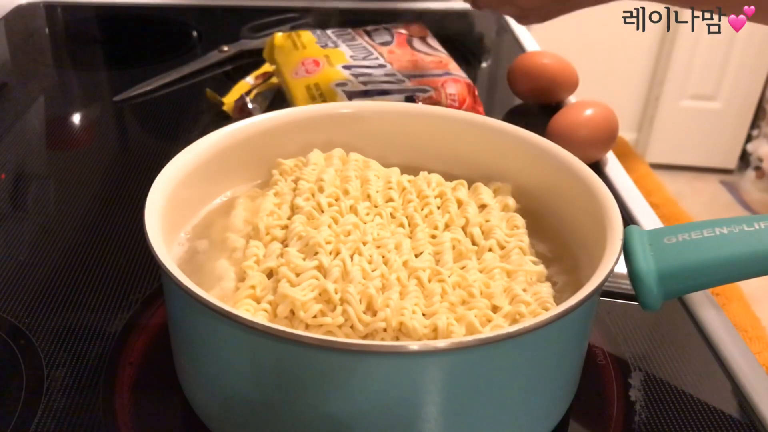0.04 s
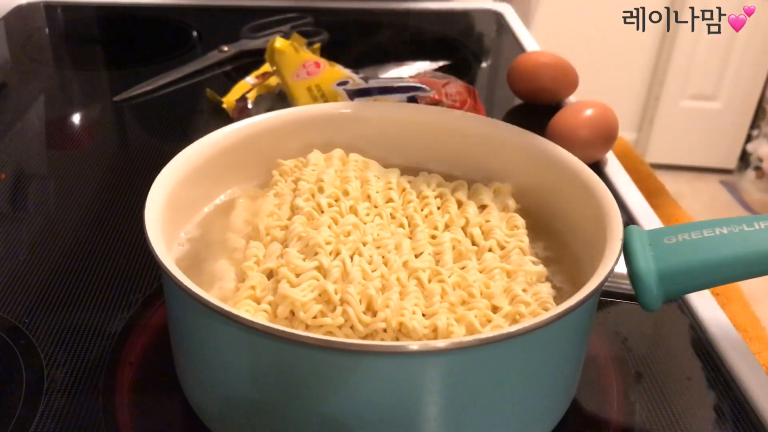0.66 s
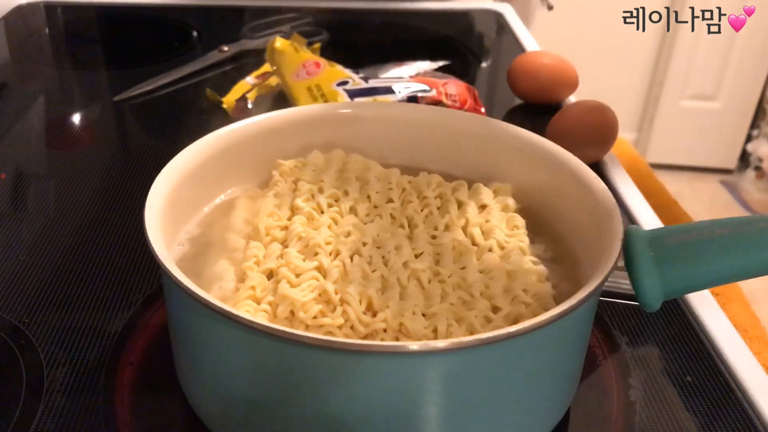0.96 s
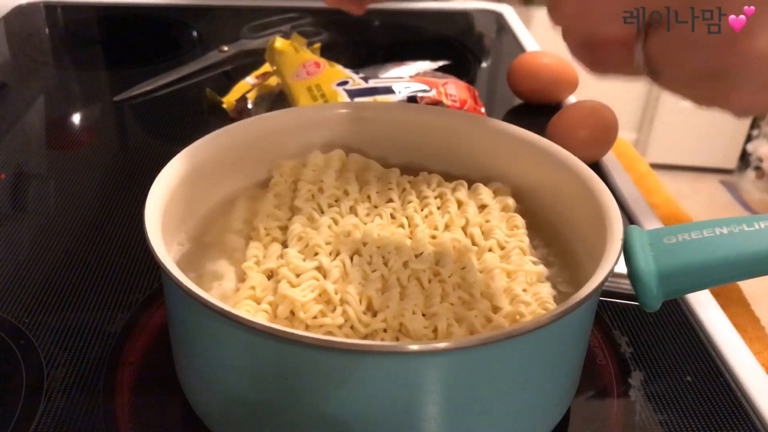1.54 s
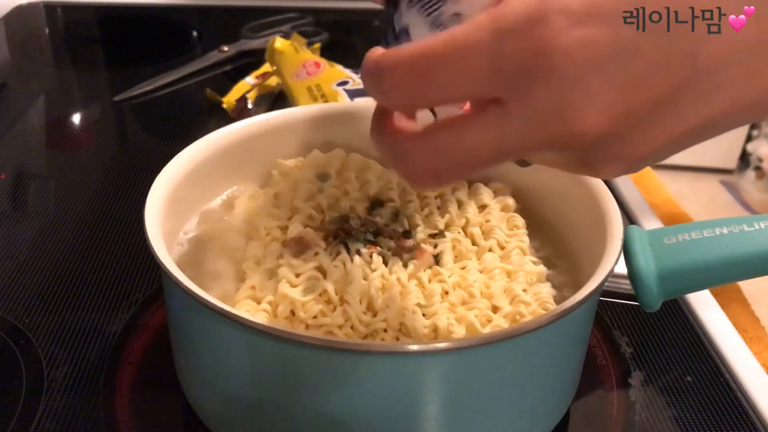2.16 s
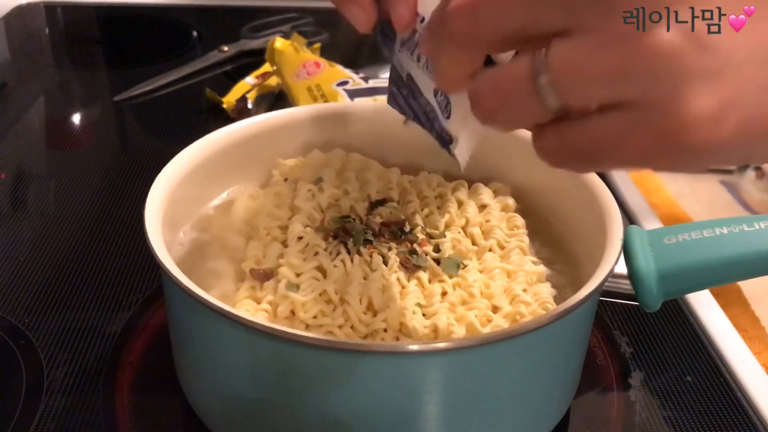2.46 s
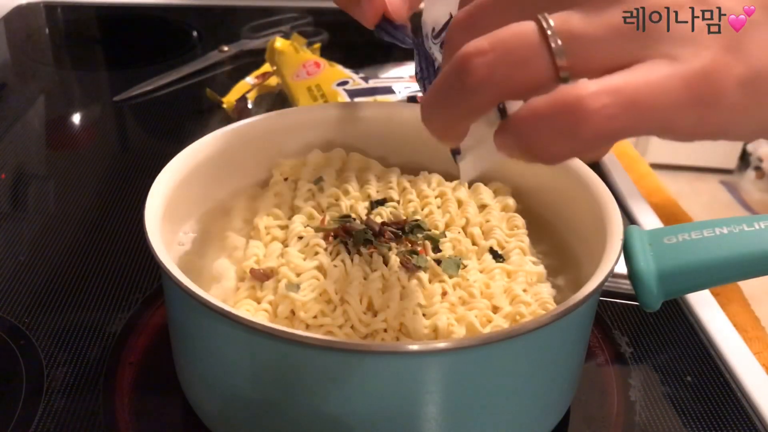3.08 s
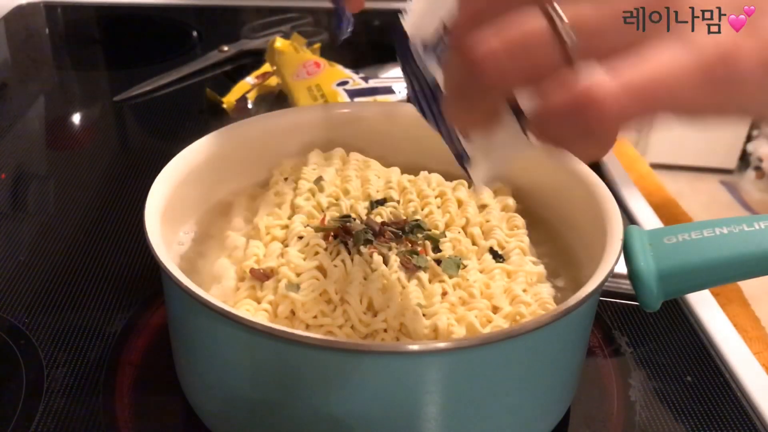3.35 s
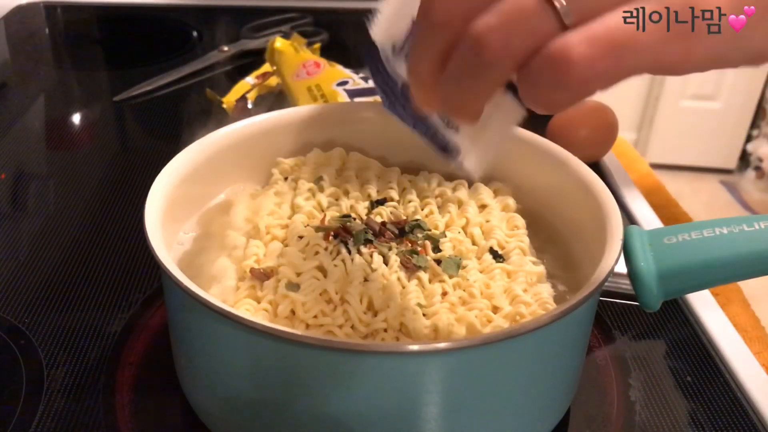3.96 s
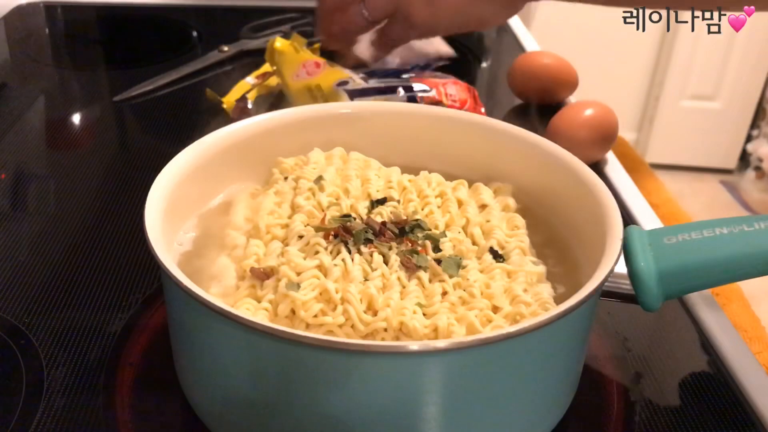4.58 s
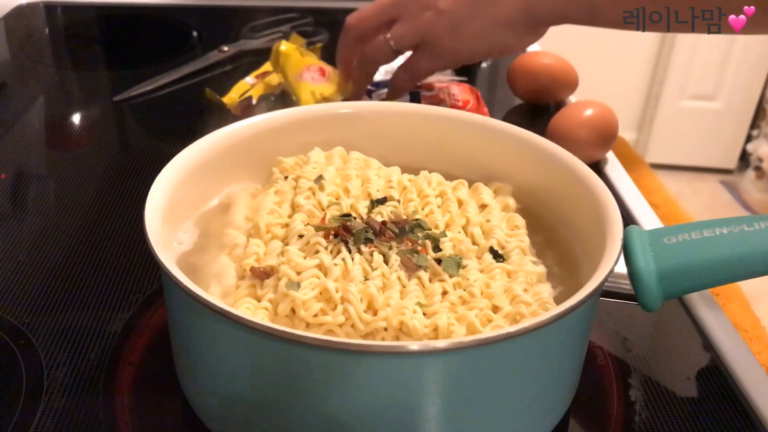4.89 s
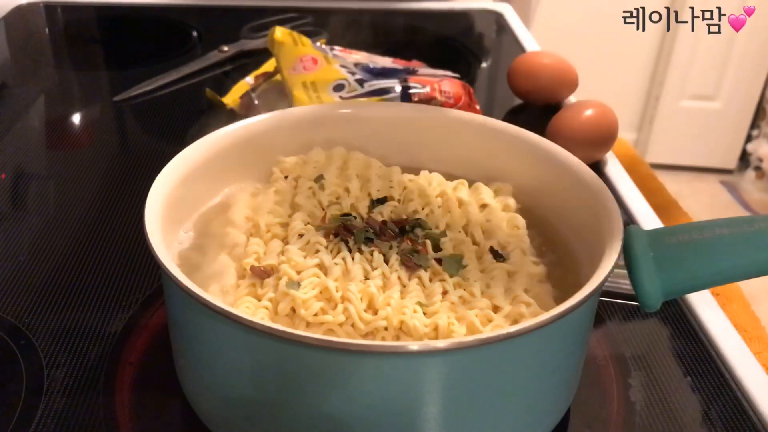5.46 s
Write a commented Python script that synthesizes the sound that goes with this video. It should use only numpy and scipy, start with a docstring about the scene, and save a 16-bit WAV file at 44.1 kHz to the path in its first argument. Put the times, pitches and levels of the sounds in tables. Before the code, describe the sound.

A low appliance hum and the faint hiss and bubbling of simmering water run throughout, heard close to a pot in a small kitchen. In the first second a foil-plastic sachet is picked up, rustling, with dull knocks on the stove top at about 0.1 and 0.5 seconds, the second the loudest, and a softer one at 0.8. From about 1.1 seconds the sachet is torn open, with a dense, crisp rip around 1.3 to 1.6. From 1.9 to 4 seconds it is shaken out: irregular sharp snaps over fine crackle, busiest between 3.5 and 4. A short lull follows with only a few faint ticks. At about 4.7 to 5.1 the packet is put down with soft bumps, a quick cluster of light knocks and more crinkling. A few small crackles come around 5.3 to 5.5. Each click has a very short room echo.

```python
"""A small kitchen, the microphone close to a pot of noodles. An appliance hums and the water simmers
faintly throughout. First a foil-plastic seasoning sachet is picked up, with a few dull knocks from the
stove top. It is torn open, then shaken out over the pot: the film buckles in sharp snaps over a bed of
fine crackle. Near the end it is put back down, with more knocks. The room answers every click."""
import sys
import numpy as np
from scipy import signal
from scipy.fft import rfft, irfft
from scipy.io import wavfile
from scipy.ndimage import uniform_filter1d

SR = 44100
rng = np.random.default_rng(int(sys.argv[2]) if len(sys.argv) > 2 else 0)


def inscribe(sig):
    """Save sig as 16-bit PCM at rate SR to the path in sys.argv[1].

    A 1-D sig is mono; a 2-D sig holds one channel per row.
    Samples are clipped to [-1, 1] before scaling.
    """
    pcm = np.round(np.clip(np.atleast_2d(sig).T, -1, 1) * 32767)
    wavfile.write(sys.argv[1], SR, pcm.astype(np.int16))


N = 248283

# Mains hum and motor tones. Each row: frequency in Hz, rms level in dB.
HUM_TONES = [(59.3, -60.5), (96.9, -98), (120, -58), (145.3, -59.5), (177.7, -67), (193.8, -61.5),
             (237, -54.5), (242.2, -62), (290.6, -70.5), (339.1, -68), (355.5, -73), (387.5, -69),
             (415, -72)]
# Moving air and the hiss of hot water. Each row: frequency in Hz, relative level in dB.
AIR_SPECTRUM = [(15, -17), (28, -21), (42, 3), (70, 5.5), (140, 8), (220, 4.5), (280, 5.5), (350, 0.5),
                (430, -7), (520, -4), (800, -9), (1400, -16), (2500, -34), (4500, -18.5), (6500, -16.5),
                (8200, -20.5), (12500, -15), (16000, -27)]
# Finger moves: picking up, tearing from 1.05 s, shaking from 1.86 s, putting down from 4.74 s.
# Each row: start in seconds, length in seconds, crackle level in dB, rustle level in dB.
FINGER_MOVES = [(0.0, 0.083, -53.5, -73), (0.297, 0.09, -52, -48.5), (0.407, 0.13, -47.5, -43.5),
                (0.68, 0.24, -61, -61.5), (1.052, 0.12, -53, -59), (1.283, .35, -49, -62),
                (1.325, .15, -41, -47.5), (1.859, 0.16, -47, -53), (2.003, 0.26, -48.5, -59),
                (2.267, 0.175, -58.5, -65.5), (2.48, 0.011, -43, -45.5), (2.56, 0.34, -56.5, -59.5),
                (2.925, .1, -69, -59.5), (3.113, 0.015, -48.5, -52.5), (3.271, 0.025, -52.5, -49.5),
                (3.494, 0.053, -64, -49.5), (3.68, 0.035, -39, -48), (3.845, 0.023, -48, -48),
                (3.95, 0.033, -41, -54.5), (4.741, 0.094, -53.5, -52.5), (4.885, 0.21, -51.5, -54),
                (5.323, 0.051, -50, -60.5)]
# The fine crackle of small creases. Each row: frequency in Hz, relative level in dB.
CRACKLE_SPECTRUM = [(500, -11), (1500, -27), (3000, -1.5), (5000, -2.5), (6800, -1.5), (8200, -4.5),
                    (9500, -5), (12500, -7), (16000, -5)]
# The duller rustle of the whole packet. Each row: frequency in Hz, relative level in dB.
RUSTLE_SPECTRUM = [(200, -13), (400, 0.5), (600, -1.5), (1150, 2), (1800, -0.5), (2600, -1), (5000, -24.5),
                   (12000, -49)]
# Things set down on the stove top. Each row: start in seconds, level in dB,
# the thing's own ring in Hz, that ring's level in dB relative to the stove's.
STOVE_KNOCKS = [(0.1341, -25.5, 1760, 1.5), (0.5257, -14.5, 2330, -3), (0.7827, -41, 1820, 9.5),
                (4.7652, -38, 2640, -14), (4.7912, -30.5, 2670, -8), (4.804, -33, 2180, -5),
                (4.8763, -25.5, 2740, -5.5)]
# The stove top's modes. Each row: frequency in Hz, relative level in dB, seconds to fall 60 dB.
STOVE_MODES = [(700, 4.5, 0.018), (1006, 10, 0.017), (1050, 11, 0.014), (1217, 18.5, 0.018)]
# Distinct clicks: film snaps, plus a few faint pops or ticks from the pot. Each row: time in seconds,
# level at 3-8 kHz in dB before FILM_COLOUR, body (below) and sparkle (above) in dB relative to that.
CLICKS = [(0.3005, -31.5, 0, -4), (0.3397, -34.5, -2, -2.5), (0.3726, -33.5, -2, -4.5),
          (0.4422, -32, -7, 7), (0.4613, -23, 0, -2), (0.6774, -29.5, -4.5, 3), (0.7183, -39.5, 2.5, -5.5),
          (0.8843, -42, 3.5, -15), (1.0309, -32, -2.5, -3), (1.064, -40, 8.5, 1), (1.181, -39.5, 3, 1.5),
          (1.2137, -30.5, 0.5, -1.5), (1.2911, -32.5, -6, -2.5), (1.3059, -29.5, 0, -1),
          (1.3563, -27.5, 0.5, 6), (1.3604, -26.5, -1.5, -0.5), (1.3763, -20, -1.5, -0.5),
          (1.4145, -21.5, 0, 1), (1.4335, -26, -11, 17.5), (1.4632, -36, 4, 17), (1.4745, -21.5, -7, 10.5),
          (1.5077, -37, 5.5, 4.5), (1.5653, -33, -4.5, 1), (1.6173, -34.5, -7, 7.5), (1.6465, -34.5, -8, 3),
          (1.8404, -33, -10, 7), (1.9666, -21.5, -19, 0), (1.9856, -26.5, -7, 6.5),
          (2.2017, -23.5, -3, -0.5), (2.221, -32, 3, 4.5), (2.2271, -27.5, -4, -3.5), (2.3041, -37.5, 5, 4),
          (2.4803, -30, -3, -0.5), (2.5198, -23.5, -3, 1), (2.5884, -33, -3.5, 9),
          (2.6207, -30.5, -2.5, -3), (2.6904, -39, 1, -0.5), (2.7194, -27, -2, -1), (2.73, -32, 2.5, 2.5),
          (2.8145, -35.5, -7.5, 2), (2.9209, -33.5, 1, 5), (2.9531, -34.5, 4.5, 4.5), (2.9613, -37.5, 2, 0),
          (2.9877, -35.5, -18, 7), (3.0058, -27, -8.5, -2), (3.0563, -32.5, -8, -1),
          (3.116, -34, 0.5, -3.5), (3.251, -34, -4.5, 11), (3.2876, -31, -6.5, 6.5),
          (3.302, -38.5, 2.5, 2.5), (3.481, -31, -2, 5), (3.5118, -27, -3, 5.5), (3.5357, -22, -4.5, 1.5),
          (3.54, -24, -14, 6), (3.5858, -25, -8.5, -5.5), (3.7015, -29, -3.5, -3.5),
          (3.729, -25.5, -7, 7.5), (3.7607, -26.5, -8, -1.5), (3.8435, -22.5, -9, 0),
          (3.8605, -24, -3, 9.5), (3.8765, -34, -17, 8), (3.8933, -26.5, -5, -5), (3.946, -33.5, 8, -2),
          (3.9698, -36, -6, 10), (3.992, -39.5, 5, -7.5), (4.092, -37, -4.5, -7.5), (4.1435, -45, 7, -4.5),
          (4.2737, -54.5, 13, -5), (4.4902, -47.5, 9, -10.5), (4.7502, -34, 1.5, 1),
          (4.877, -25.5, -2.5, 6), (4.9593, -39.5, -2, 8), (5.0007, -34.5, -0.5, -3), (5.497, -48, -14, 13),
          (5.543, -33.5, -12, -2)]
# Film tension and distance: taut sounds thin, slack lower; snaps ring longer farther off, on the stove.
# Each row: time in seconds, lower edge of the body in Hz, decay of a snap as heard in seconds.
TENSION_AND_DISTANCE = [(0.5, 890, 0.0055), (1.1, 1500, 0.0018), (1.45, 1370, 0.00058), (2.1, 880, 0.0019),
                        (3.3, 790, 0.00092), (3.55, 550, 0.00028), (4.0, 700, 0.00091), (4.8, 1110, 0.0044),
                        (5.5, 1330, 0.0029)]
# The film's colour as heard over the pot. Each row: frequency in Hz, gain in dB.
FILM_COLOUR = [(500, -6), (1100, -2.5), (1600, -4), (2300, -4), (3000, -2), (4200, 1), (5000, -0.5),
               (6700, 3), (8200, -4.5), (9500, 2), (10400, -4.5), (12000, 2), (16000, -8)]
# Soft bumps of hand and packet. Each row: start in seconds, level in dB, pitch in Hz.
HAND_BUMPS = [(0.419, -46.5, 427), (0.439, -51, 131), (0.782, -39.5, 660), (1.358, -45, 417),
              (1.374, -41, 550), (1.408, -46, 477), (4.683, -46, 145), (4.701, -42.5, 221),
              (4.788, -44, 390), (4.802, -45, 366)]
# The kitchen's decay. Each row: frequency in Hz, seconds to fall 60 dB.
ROOM_DECAY = [(200, 0.25), (1200, 0.25), (4000, 0.13), (9000, 0.26), (16000, 0.27)]
# The colour of the wall reflections. Each row: frequency in Hz, relative level in dB.
ROOM_COLOUR = [(200, -5.5), (1200, 4.5), (4000, 5.5), (9000, -1), (16000, -0.5)]

BODY_TOP_HZ, SPARKLE_HZ, EDGE_HZ = 2890, 8300, 16050  # upper edges of the film's three registers
MS = SR // 1000  # samples in a millisecond


def amp(db):
    """Decibels to gain."""
    return 10 ** (np.asarray(db) / 20)


def unit(x):
    """Scales to rms 1."""
    return x / np.sqrt(np.mean(x ** 2) + 1e-20)


def unit_click(x):
    """Scales to the energy of one millisecond at rms 1."""
    return x * np.sqrt(MS / (np.sum(x ** 2) + 1e-20))


def read(points, hz):
    """Reads a spectrum table on a log-frequency axis."""
    table_hz, value = np.transpose(points)
    return np.interp(np.log(hz + 1), np.log(table_hz + 1), value)


def add(mix, start_s, sound):
    """Mixes a sound in at its start time."""
    part = mix[max(round(start_s * SR), 0):][:len(sound)]
    part += sound[:len(part)]


def band(x, lo_hz, hi_hz):
    """Causal band-pass."""
    sections = signal.butter(3, [lo_hz, min(hi_hz, SR / 2 - 1)], "band", fs=SR, output="sos")
    return signal.sosfilt(sections, x)


def colour(x, spectrum):
    """Filters a scene-long signal by a spectrum table."""
    return irfft(rfft(x) * amp(read(spectrum, np.fft.rfftfreq(N, 1 / SR))), N)


def seconds(size):
    """Time axis of so many samples."""
    return np.arange(size) / SR


def grains(per_s, spread_db, decay_s, count=40):
    """A random patter of tiny bursts in many shapes and sizes."""
    t, out = seconds(256), np.zeros(N)
    shapes = [unit_click(noise * np.exp(-t / decay_s)) for noise in rng.standard_normal((count, len(t)))]
    sizes = amp(spread_db * np.minimum(rng.exponential(1, N), 3))
    pick = rng.integers(0, count, N)
    for at in np.flatnonzero(rng.random(N) < per_s / SR):
        add(out, at / SR, sizes[at] * shapes[pick[at]])
    return out


def appliance_hum(waver=0.013):
    """Mains and motor tones in the background, each wavering slightly in level."""
    t, out = seconds(N), np.zeros(N)
    knots = np.linspace(0, N / SR, 30)
    for hz, db in HUM_TONES:
        level = amp(db) * (1 + waver * np.interp(t, knots, rng.standard_normal(len(knots))))
        out += level * np.sqrt(2) * np.sin(2 * np.pi * (hz * t + rng.random()))
    return out


def simmer(hiss_db=-56, bubbles_db=-64):
    """Small bubbles burst in the pot, under moving air and the hiss of hot water."""
    bubbles = unit(band(grains(per_s=160, spread_db=4.5, decay_s=0.0015), 620, 7400))
    hiss = unit(colour(rng.standard_normal(N), AIR_SPECTRUM))
    return amp(hiss_db) * hiss + amp(bubbles_db) * bubbles


def finger_effort(attack_s=0.013, release_s=0.015, held_crackle_db=-62.5, held_rustle_db=-66):
    """Crackle and rustle gains: each move sets in quickly, holds, and dies as the film relaxes."""
    t = seconds(N)
    power = amp([[held_crackle_db], [held_rustle_db]]) ** 2 * np.ones(N)  # even a held packet stirs
    for start, length, crackle_db, rustle_db in FINGER_MOVES:
        attack = np.clip((t - start) / attack_s + 0.5, 0, 1)
        release = np.exp(-np.clip(t - start - length, 0, 1) / release_s)
        power += (amp([[crackle_db], [rustle_db]]) * attack * release) ** 2
    return np.sqrt(power)


def crinkle(crackle_gain, rustle_gain):
    """Small creases give way as hard as the fingers work, and the whole packet rustles."""
    crackle = unit(colour(grains(per_s=600, spread_db=3, decay_s=0.0009), CRACKLE_SPECTRUM))
    rustle = unit(colour(grains(per_s=500, spread_db=5, decay_s=0.0037), RUSTLE_SPECTRUM))
    return crackle * crackle_gain + rustle * rustle_gain


def small_buckles(crackle_gain, per_s=24, over_crackle_db=10, spread_db=4.5, top_db=-35):
    """Lesser buckles at chance moments, as strong as the film is worked: rows as in CLICKS."""
    count = int(per_s * N / SR)
    at = ((np.arange(count) + rng.random(count)) * N / count).astype(int)
    size, body, sparkle = np.clip(rng.standard_normal((count, 3)), -2, 2).T
    db = np.minimum(20 * np.log10(crackle_gain[at]) + over_crackle_db + spread_db * size, top_db)
    body_db, sparkle_db = -5 + 5.5 * body, 5.5 * sparkle
    return list(zip(at / SR, db, body_db, sparkle_db))


def film_flip(t, decay_s, facet_hz, flutter_db=-22, flutter_s=0.011, creases_db=-20, crease_s=0.0066,
              creases_per_s=300, before_s=0.0063, after_s=0.0047, facet_db=4, neighbour_db=-4):
    """A sheet strains, flips at t = 0, and flutters while nearby creases give way."""
    noise, sizes = rng.standard_normal((2, len(t)))
    age = np.maximum(t, 0)
    kicks = abs(sizes) * (rng.random(len(t)) < creases_per_s / SR)
    creases = signal.lfilter([1], [1, -np.exp(-1 / (crease_s * SR))], kicks)
    creases *= np.exp(np.minimum(t, 0) / before_s - age / after_s)
    snap = (t >= 0) * np.exp(-age / decay_s)
    flutter = (t >= 0) * np.exp(-age / flutter_s)
    stir = np.sqrt(min(decay_s * SR / MS, 2))  # a longer snap carries more flutter and creasing
    burst = noise * (snap + stir * (amp(flutter_db) * flutter + amp(creases_db) * creases))
    # the flipping facet rings, and so does a neighbour of random size
    facet = signal.lfilter(*signal.iirpeak(min(facet_hz, EDGE_HZ), Q=6, fs=SR), burst)
    neighbour_hz = np.exp(rng.uniform(np.log(1000), np.log(12000)))
    neighbour = signal.lfilter(*signal.iirpeak(neighbour_hz, Q=6, fs=SR), burst)
    return burst + amp(facet_db) * facet + amp(neighbour_db) * neighbour


def snaps_and_pops(rows, centre_hz=6150, octaves_per_db=0.18, scatter_octaves=0.17, aimed_db=-23,
                   aim=0.59):
    """Film buckles, near or farther off, and faint pot pops: at the microphone and into the room."""
    direct, to_room = np.zeros((2, N))
    t = seconds(3000) - 10 * MS / SR
    when, lowest_hz, decay_s = np.transpose(TENSION_AND_DISTANCE)
    for at_s, db, body_db, sparkle_db in rows:
        # a small facet rings higher and gives more sparkle than body
        octaves = octaves_per_db * (sparkle_db - body_db) + scatter_octaves * rng.standard_normal()
        burst = film_flip(t, np.interp(at_s, when, decay_s), centre_hz * 2 ** octaves)
        edges = [np.interp(at_s, when, lowest_hz), BODY_TOP_HZ, SPARKLE_HZ, EDGE_HZ]
        registers = np.array([unit_click(band(burst, lo, hi)) for lo, hi in zip(edges, edges[1:])])
        levels_db = db + np.array([body_db, 0, sparkle_db])
        add(direct, at_s + t[0], amp(levels_db) @ registers)
        # the loudest snaps come from facets aimed at the microphone, so the room gets less of them
        room_db = levels_db - aim * np.maximum(levels_db - aimed_db, 0)
        add(to_room, at_s + t[0], amp(room_db) @ registers)
    return colour(direct, FILM_COLOUR), colour(to_room, FILM_COLOUR)


def stove_knocks(ring_t60=0.014, rattle_db=-23, rattle_s=0.03, tick_db=-20, tick_s=0.0081):
    """A blow ticks, then rings the damped stove top and the thing set down, which rattles briefly."""
    t, out = seconds(3000), np.zeros(N)
    hz, mode_db, t60 = np.transpose(STOVE_MODES)[:, :, None]
    modes = amp(mode_db - 60 * t / t60) * np.cos(2 * np.pi * hz * t)
    stove = unit_click(band(modes.sum(0), 700, 1400))
    for start, db, ring_hz, ring_db in STOVE_KNOCKS:
        tone = amp(-60 * t / ring_t60) * np.cos(2 * np.pi * ring_hz * t)
        ring = unit_click(band(tone, 0.44 * ring_hz, 2.4 * ring_hz))
        rattle = unit_click(band(rng.standard_normal(len(t)) * np.exp(-t / rattle_s), 1600, 5600))
        tick = unit_click(band(rng.standard_normal(len(t)) * np.exp(-t / tick_s), 3000, 8800))
        knock = stove + amp(ring_db) * ring + amp(rattle_db) * rattle + amp(tick_db) * tick
        add(out, start, amp(db) * knock)
    return out


def hand_bumps(swell_cycles=1.7):
    """A soft touch gives a broad low puff with no click; the lower, the slower."""
    t, out = seconds(4000), np.zeros(N)
    for start, db, hz in HAND_BUMPS:
        puff = unit(band(rng.standard_normal(len(t)), 0.5 * hz, 1.66 * hz))
        swell = t * hz / swell_cycles
        add(out, start, amp(db) * swell * np.exp(1 - swell) * puff)
    return out


def room_tail(echoes_per_s=4000, first_echo_s=0.004):
    """Sparse reflections off near walls, dying fastest around 4 kHz."""
    t = seconds(SR // 2)
    echoes = rng.standard_normal(len(t)) * (rng.random(len(t)) < echoes_per_s / SR) * (t > first_echo_s)
    hz, age, spectra = signal.stft(echoes, SR, nperseg=256)
    spectra *= amp(read(ROOM_COLOUR, hz)[:, None] - 60 * age / read(ROOM_DECAY, hz)[:, None])
    tail = signal.istft(spectra, SR)[1][:len(t)]
    return tail / np.linalg.norm(tail)


def kitchen_echo(x, tail_db=-10.5, directions=4, turn_s=0.017):
    """The moving packet radiates in changing directions, so the room's answer keeps changing."""
    facing = (seconds(N) / turn_s).astype(int) % directions
    shares = [uniform_filter1d(1.0 * (facing == k), 2 * MS) for k in range(directions)]
    return amp(tail_db) * sum(signal.oaconvolve(x * share, room_tail())[:N] for share in shares)


def scene(knocks_room_db=-2):
    """One microphone by the pot: sachet and knocks in front, the humming kitchen behind."""
    crackle_gain, rustle_gain = finger_effort()
    clicks, clicks_to_room = snaps_and_pops(CLICKS + small_buckles(crackle_gain))
    handling = crinkle(crackle_gain, rustle_gain) + hand_bumps()
    knocks = stove_knocks()
    room = kitchen_echo(clicks_to_room + handling + amp(knocks_room_db) * knocks)
    return (clicks + handling + knocks + room + appliance_hum() + simmer())[None]


def record(dry):
    """The recorder's band limit."""
    low_pass = signal.firwin(255, EDGE_HZ, window=("kaiser", 8), fs=SR)
    return signal.oaconvolve(dry, low_pass[None], "same")


dry = scene()
out = record(dry)
inscribe(out)
```